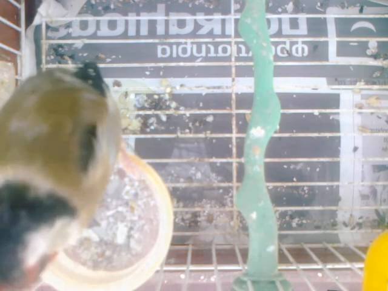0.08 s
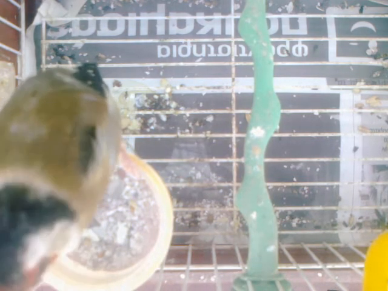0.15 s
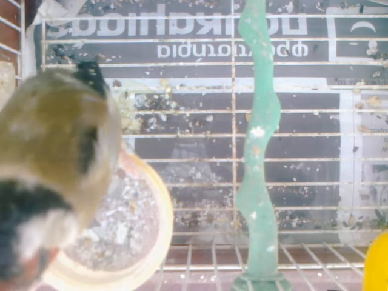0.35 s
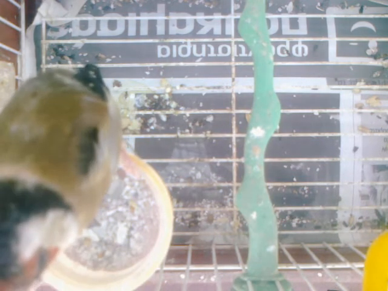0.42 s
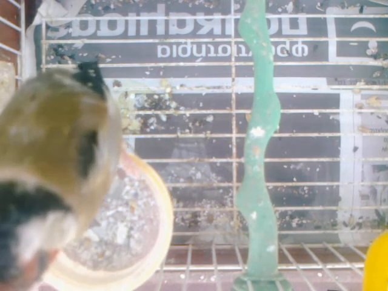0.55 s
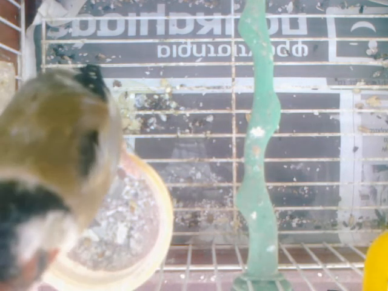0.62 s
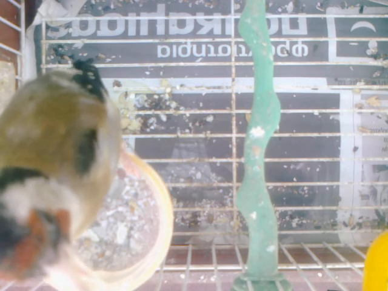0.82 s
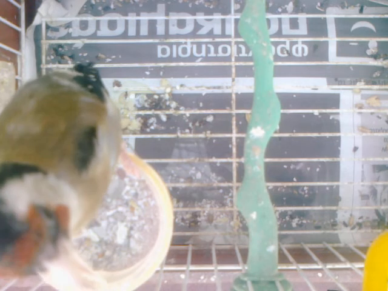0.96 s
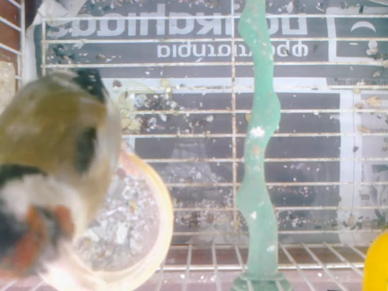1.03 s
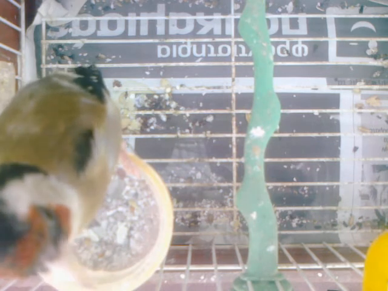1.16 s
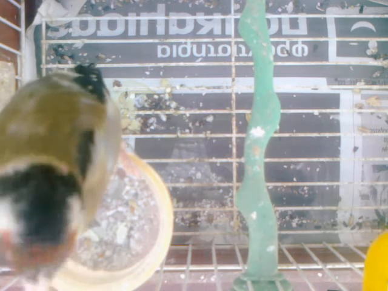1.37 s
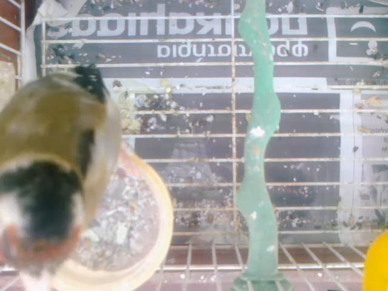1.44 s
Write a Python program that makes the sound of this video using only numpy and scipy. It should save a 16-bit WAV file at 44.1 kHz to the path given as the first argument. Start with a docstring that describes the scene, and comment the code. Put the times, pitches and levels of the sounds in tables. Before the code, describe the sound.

A small caged finch twitters close by, quick rising chirps then four buzzy falling notes

```python
"""First a low indoor rumble with hum and a thin whine, then a goldfinch twittering close by in its cage.
It gives six short slurred chirps, then four longer falling notes that each end in a steep buzzy drop.
The two sides of its syrinx sing separate pitches, which beat and mix into sum and difference tones.
The cage rings thinly and a small room answers faintly; far off, a whistle and a nasal call come late.
Pitch curves drive the voices, filtered noise the rasp and rumble; all reach one microphone channel."""
import sys
import numpy as np
from scipy import signal
from scipy.fft import rfft, irfft
from scipy.io import wavfile
from scipy.ndimage import uniform_filter1d

SR = 44100
rng = np.random.default_rng(int(sys.argv[2]) if len(sys.argv) > 2 else 0)


def master_out(mix):
    """Clip the mix to full scale and print it as 16-bit PCM to the path in sys.argv[1]."""
    frames = np.transpose(np.atleast_2d(mix))
    ceiling = np.clip(frames, -1, 1)
    pcm = np.round(ceiling * 32767).astype(np.int16)
    wavfile.write(sys.argv[1], SR, pcm)


N = 66150
TIME_S = np.arange(N) / SR

# spectrum shape of the room rumble and hiss: (pitch_hz, relative_level_db per Hz)
RUMBLE_SPECTRUM = [(25, 0), (70, 0), (160, -10.5), (1100, -16.5), (2000, -23), (4000, -33.5), (8000, -38),
                   (16000, -46.5)]
# level of the whole background: (time_s, level_db)
BACKGROUND_LEVEL = [(0, -44.5), (.7, -50), (1.3, -52.5), (1.5, -54.5)]
# hum tones: (pitch_hz, level_db re the rumble)
HUM_TONES = [(73, -8), (123, -9)]
# leading side of the syrinx, chirp curves (the second and third join into one slur);
# overtone levels are before the throat: (time_s, pitch_hz, level_db, second_harmonic_db re the tone)
CHIRP_CURVES = [
    [(.196, 1955, -44.5, -11), (.201, 2198, -28.5, -3.5), (.208, 3107, -6.5, -26.5),
     (.213, 3680, -6, -16.5), (.221, 4016, -9, -35), (.230, 4250, -21, -30)],
    [(.276, 2670, -13.5, -6), (.278, 2843, -17.5, -6), (.289, 3088, -12, -5.5), (.297, 3260, -25.5, -1.5)],
    [(.297, 3060, -21.5, -10), (.300, 3490, -12, -17), (.304, 4440, -7, -27), (.311, 5010, -6, -35),
     (.317, 5273, -8.5, -34.5), (.322, 5210, -11, -35), (.328, 5265, -20.5, -29)],
    [(.351, 2310, -42, -20), (.356, 2697, -27, -25.5), (.365, 2630, -15.5, -24), (.376, 2810, -14.5, -26),
     (.381, 2950, -5, -34.5), (.391, 3315, -7, -30), (.398, 3328, -10, -27.5), (.406, 3770, -31.5, -25.5)],
    [(.440, 6180, -19, -16), (.450, 6044, -14, -10), (.458, 6036, -7.5, -20.5), (.469, 6030, -6, -31),
     (.481, 5836, -22, -24)],
    [(.535, 4764, -40, -15.5), (.542, 4823, -19, -8.5), (.548, 4942, -8, -17), (.555, 5107, -4.5, -32),
     (.564, 5133, -7, -31), (.574, 5310, -24.5, -24)],
    [(.620, 2195, -32, -6), (.631, 2570, -28.5, 8), (.638, 2900, -16, -8.5), (.646, 3262, -8, -21.5),
     (.657, 3855, -6, -19), (.663, 3980, -6, -30.5), (.6675, 4068, -20, -28.5)],
]
# the other side joins in for moments: same columns
SECOND_SIDE_CURVES = [
    [(.215, 4244, -35, -30.5), (.223, 4262, -18, -35.5), (.230, 4390, -21, -29)],
    [(.306, 4050, -20.5, -23.5), (.316, 4340, -13.5, -17.5), (.327, 4720, -25, -21)],
    [(.441, 6860, -32.5, -21.5), (.458, 7240, -22, -23), (.478, 7470, -29.5, -20)],
    [(.623, 2836, -34.5, -9.5), (.628, 3070, -18.5, -8.5), (.636, 3280, -14.5, -14),
     (.644, 3563, -11.5, -22), (.648, 3537, -34, -19)],
]
# moments when the chirps turn hoarse: (time_s, noise_level_db before band and throat filters)
HOARSE_MOMENTS = [(0.282, -31), (.634, -21.5)]
# throat and beak colouring of overtones, mixed tones and noise: (pitch_hz, gain_db)
THROAT_COLOUR = [(2100, -13.5), (3100, 2.5), (6200, 3.5), (7200, -15), (9000, -6), (11200, -2),
                 (12100, -3.5), (12800, -19.5), (14200, -13.5), (16000, -20)]
# thin ringing of the cage: (pitch_hz, peak_gain_db)
CAGE_RESONANCES = [(3295, -20.5), (5150, -23), (5560, -23), (6038, -29)]
# near reflections in the room, before its colour: (delay_s, level_db)
ROOM_REFLECTIONS = [(.013, -28), (0.045, -38)]
# colour of the reflections and tail: (pitch_hz, gain_db)
ROOM_TONE = [(1000, 0), (3000, -2.5), (5500, -1), (7500, -3), (10000, 0.5), (16000, -4.5)]
# falling notes; pitch and length entries are factors, levels are offsets: (start_s, drop_start_s,
# upper_pitch, upper_level_db, lower_length, lower_pitch, lower_level_db, drop_length, drop_level_db)
FALLING_NOTES = [(0.7141, 0.7829, 0.98, -1.5, 0.94, 0.99, 0.5, 0.91, 1.5),
                 (.852, 0.9202, 0.98, -0.5, 0.96, 1.0, 0, 0.95, 1),
                 (0.9832, 1.0572, 0.99, 0.5, 1.04, 1.005, -2, .92, 0.5),
                 (1.1229, 1.1963, 0.97, -1, 1.05, 0.99, -3.5, 0.97, 0.5)]
# shared glide shapes of the upper and lower side, before those factors and offsets:
# (from_start_s, pitch_hz, level_db, second_harmonic_db re the tone)
UPPER_GLIDE = [(0, 8960, -21, -30.5), (.004, 8580, -9, -37), (.009, 8020, -7.5, -31),
               (.015, 7770, -12, -14.5), (0.025, 7275, -13.5, -10.5), (0.045, 6458, -7, -28),
               (.053, 6080, -9, -31), (.062, 5647, -6, -20), (.068, 5703, -10, -23),
               (0.072, 5944, -25, -17)]
LOWER_GLIDE = [(.005, 4840, -38.5, 3.5), (.017, 4487, -26, 6.5), (0.032, 4136, -11, -1.5),
               (0.041, 3970, -15.5, -18), (.048, 3850, -25.5, -15), (0.053, 3680, -30.5, -11.5)]
# shared drop shapes, counted from the start of the drop: same columns
UPPER_DROP = [(-.001, 6706, -17.5, -17.5), (.001, 6165, -10.5, -24.5), (.0035, 5287, -7, -27),
              (.0055, 4835, -9, -27), (.009, 5100, -13.5, -14), (.014, 4834, -16.5, -26.5),
              (.020, 3800, -16, -30), (.027, 2750, -21, -5), (.035, 2108, -31, 4)]
LOWER_DROP = [(.008, 4518, -34, -29), (.013, 3568, -15.5, -27), (0.02, 2680, -20.5, 1),
              (0.026, 1987, -26, 6), (.031, 1620, -27, -1), (0.037, 1253, -31, -17)]
# throat colouring during the drops: (pitch_hz, gain_db)
DROP_THROAT_COLOUR = [(1100, -19), (2700, 8), (6100, -1), (7100, -22), (8800, -23.5), (10000, -10),
                      (16000, -30)]
# far whistle: (time_s, pitch_hz, level_db)
WHISTLE_CURVE = [(1.24, 755, -50), (1.305, 915, -45), (1.371, 928, -60.5)]
# far call, one level_db per partial, from the third partial up
CALL_PARTIALS_DB = [-54, -56.5, -62, -67.5, -61]
# mixing in the syrinx, before the throat: sum, difference and sideband tones, overtone rolloff
# per harmonic above the second, and rasp
CHIRP_MIX = dict(sum_db=-15.5, difference_db=-41, sideband_db=-28, rolloff_db=-8, rasp_db=-30)
GLIDE_MIX = dict(sum_db=-1, difference_db=-8, sideband_db=-10, rolloff_db=-20.5, rasp_db=-18.5)
DROP_MIX = dict(sum_db=10.5, difference_db=-8, sideband_db=-8, rolloff_db=-4.5, rasp_db=-6.5)

WHINE_HZ, WHINE_WIDTH_HZ = 10400, 60
WHINE_PEAK_DB = -25.5  # sine amplitude re the rumble, before its random flutter
EDGE_S = .001
JITTER, JITTER_RATE_HZ, SHIMMER_DB = 0.0045, 290, .5  # jitter is a fraction of the pitch
AIR_DB, AIR_WIDTH_HZ = -43.5, 410  # turbulence that rides on the tones
FUZZ_DB, FUZZ_WIDTH_HZ = -7, 500  # overtones and mixed tones flutter much more than the tones
RASP_BAND_HZ, HOARSE_BAND_HZ = (5900, 10000), (3900, 6800)
LONE_RASP_DB = -10  # rasp of the leading side alone, re both together
COUPLING_POWER = 0.79  # mixed tones grow more slowly than the second side's amplitude
CATCHES_S, CATCH_WIDTH_S, CATCH_DEPTH = [.3775, .384], 0.0014, 0.62
HOARSE_WIDTH_S = 0.0075
CAGE_T60_S = .42
ROOM_TAIL_DB, ROOM_T60_S = -21.5, 0.28  # tail level before the room colour
GLIDE_RELEASE_S = 0.0069
CALL_START_S, CALL_ATTACK_S, CALL_HZ = 1.439, 0.031, 505
FAR_BLUR_HZ = 59.98
CUTOFF_HZ = 16000


def from_db(db):
    """Turn decibels into an amplitude gain."""
    return 10 ** (np.asarray(db) / 20)


def rms_one(x):
    """Scale a sound to unit power."""
    return x / np.sqrt(np.mean(x ** 2) + 1e-20)


def coloured(x, points):
    """Filter a sound by a gain curve, interpolated over log frequency."""
    curve_hz, curve_db = np.transpose(points)
    bin_hz = np.maximum(np.arange(N + 1) * SR / (2 * N), 1)
    gain = from_db(np.interp(np.log(bin_hz), np.log(curve_hz), curve_db))
    return irfft(rfft(x, 2 * N) * gain)[:N]  # padding avoids wrap-around


def drift(rate_hz):
    """Smooth random motion of about unit spread: noise through two equal low-pass poles."""
    pole = np.exp(-2 * np.pi * rate_hz / SR)
    smooth = signal.lfilter([1], [1, -2 * pole, pole * pole], rng.standard_normal(2 * N))
    return rms_one(smooth[N:])  # leave out the filter's start


def hiss(band_hz):
    """Band-passed noise with soft edges."""
    band = signal.butter(1, band_hz, "band", fs=SR, output="sos")
    return signal.sosfilt(band, rng.standard_normal(N))


def background():
    """Room rumble and hiss with a phase-wandering hum and a thin fluttering whine, slowly fading."""
    rumble = rms_one(coloured(rng.standard_normal(N), RUMBLE_SPECTRUM))
    hum = np.zeros(N)
    for hz, db in HUM_TONES:
        hum += from_db(db) * np.sqrt(2) * np.sin(2 * np.pi * hz * TIME_S + 1.7 * drift(6.1))
    whine = from_db(WHINE_PEAK_DB) * drift(WHINE_WIDTH_HZ) * np.sin(2 * np.pi * WHINE_HZ * TIME_S)
    level_db = np.interp(TIME_S, *np.transpose(BACKGROUND_LEVEL))
    return (rumble + hum + whine) * from_db(level_db)


def syrinx_side(curves, rolloff_db):
    """One side follows its curves: a slightly unsteady airy tone (complex), and its overtones."""
    hz, gain, bright = np.zeros((3, N))
    for curve in curves:
        time_s, pitch_hz, level_db, second_db = np.transpose(curve)
        inside_s = np.minimum(TIME_S - time_s[0], time_s[-1] - TIME_S)
        gate = np.clip(inside_s / EDGE_S / 2 + .5, 0, 1)
        hz = np.where(gate > 0, np.interp(TIME_S, time_s, pitch_hz), hz)
        gain += np.sin(gate * np.pi / 2) ** 2 * from_db(np.interp(TIME_S, time_s, level_db))
        bright = np.where(gate > 0, from_db(np.interp(TIME_S, time_s, second_db)), bright)
    hz = uniform_filter1d(hz, size=40) * (1 + JITTER * drift(JITTER_RATE_HZ))
    gain = gain * from_db(SHIMMER_DB * drift(JITTER_RATE_HZ))
    phase = 2 * np.pi * np.cumsum(hz) / SR
    overtones = np.zeros(N)
    for k in range(2, 6):
        partial = np.cos(k * phase + np.pi * k * k / 2) * (k * hz < SR / 2)
        overtones += from_db(rolloff_db * (k - 2)) * partial
    air = from_db(AIR_DB) * (drift(AIR_WIDTH_HZ) + 1j * drift(AIR_WIDTH_HZ))
    return gain * np.exp(1j * phase) * (1 + air), gain * bright * overtones


def syrinx(leading, other, throat, sum_db, difference_db, sideband_db, rolloff_db, rasp_db):
    """Two sides on one air stream modulate each other; rasp grows when both sound or overtones swell."""
    a, overtones_a = syrinx_side(leading, rolloff_db)
    b, overtones_b = syrinx_side(other, rolloff_db)
    overtones = overtones_a + overtones_b
    p, q = np.angle(a), np.angle(b)
    mixed = from_db(sum_db) * np.cos(p + q)
    mixed += from_db(difference_db) * np.cos(p - q)
    mixed += from_db(sideband_db) * (np.sin(2 * p - q) - np.sin(p + 2 * q))
    mixed *= np.abs(a) * np.abs(b) ** COUPLING_POWER
    lone = np.abs(from_db(LONE_RASP_DB) * a)
    roughness = np.sqrt(np.abs(a * b) + overtones ** 2 + lone ** 2)
    rasp = from_db(rasp_db) * roughness * hiss(RASP_BAND_HZ)
    fuzz = 1 + from_db(FUZZ_DB) * drift(FUZZ_WIDTH_HZ)
    return (a + b).real + coloured((overtones + mixed) * fuzz + rasp, throat)


def bumps(centre_s, width_s):
    """A brief bell-shaped swell around one moment."""
    return np.exp(-((TIME_S - centre_s) / width_s) ** 2)


def chirps():
    """Short slurred notes; the voice catches twice in one of them and breaks into noise at moments."""
    voice = syrinx(CHIRP_CURVES, SECOND_SIDE_CURVES, THROAT_COLOUR, **CHIRP_MIX)
    catches = sum(bumps(s, CATCH_WIDTH_S) for s in CATCHES_S)
    hoarse = sum(from_db(db) * bumps(s, HOARSE_WIDTH_S) for s, db in HOARSE_MOMENTS)
    hoarse_noise = coloured(hoarse * hiss(HOARSE_BAND_HZ), THROAT_COLOUR)
    return voice * (1 - CATCH_DEPTH * catches) + hoarse_noise


def cage(x):
    """Narrow resonances ring on after a note has swept through them."""
    pole = from_db(-60 / (CAGE_T60_S * SR))
    ringing = np.zeros(N)
    for hz, db in CAGE_RESONANCES:
        poles = [1, -2 * pole * np.cos(2 * np.pi * hz / SR), pole * pole]
        mode = signal.lfilter([1, 0, -1], poles, x + 1e-18)
        ringing += from_db(db) * (1 - pole) * mode
    return ringing


def room(x):
    """Two near reflections and a smooth tail of exponentially decaying noise."""
    response = rng.standard_normal(N) * from_db(-60 * TIME_S / ROOM_T60_S)
    response *= from_db(ROOM_TAIL_DB) / np.sqrt(np.sum(response ** 2))
    for delay_s, db in ROOM_REFLECTIONS:
        response[int(delay_s * SR)] += from_db(db)
    return coloured(signal.fftconvolve(x, response)[:N], ROOM_TONE)


def placed(shape, start_s, length=1, pitch=1, level_db=0):
    """Set a shared note shape at its time, stretched, retuned and made louder or softer."""
    return [(start_s + s * length, hz * pitch, db + level_db, second) for s, hz, db, second in shape]


def glides():
    """Four two-voiced downward slides, each faded out by the time its drop begins."""
    upper, lower, held = [], [], np.zeros(N)
    for start, drop, up_pitch, up_db, low_length, low_pitch, low_db, _, _ in FALLING_NOTES:
        upper.append(placed(UPPER_GLIDE, start, 1, up_pitch, up_db))
        lower.append(placed(LOWER_GLIDE, start, low_length, low_pitch, low_db))
        held += (TIME_S > start - EDGE_S) * np.clip((drop - TIME_S) / GLIDE_RELEASE_S, 0, 1)
    return held * syrinx(upper, lower, THROAT_COLOUR, **GLIDE_MIX)


def drops():
    """The upper side falls and flicks up, then both plunge, overtones sweeping the throat's passband."""
    upper, lower = [], []
    for _, start, *_, length, level_db in FALLING_NOTES:
        upper.append(placed(UPPER_DROP, start, length, 1, level_db))
        lower.append(placed(LOWER_DROP, start, length, 1, level_db))
    return syrinx(upper, lower, DROP_THROAT_COLOUR, **DROP_MIX)


def far_partial(hz):
    """A tone that distance makes waver on its own: both quadratures drift at random."""
    phase = 2 * np.pi * np.cumsum(hz * np.ones(N)) / SR
    wavering = drift(FAR_BLUR_HZ) * np.cos(phase) + drift(FAR_BLUR_HZ) * np.sin(phase)
    return wavering / np.sqrt(2)


def far_calls():
    """A faint rising whistle and, at the end, a faint nasal call of partials above a missing low part."""
    time_s, pitch_hz, level_db = np.transpose(WHISTLE_CURVE)
    whistle_gain = np.interp(TIME_S, time_s, from_db(level_db), left=0, right=0)
    whistle = far_partial(np.interp(TIME_S, time_s, pitch_hz)) * whistle_gain
    call = sum(from_db(db) * far_partial(k * CALL_HZ) for k, db in enumerate(CALL_PARTIALS_DB, 3))
    return whistle + call * np.clip((TIME_S - CALL_START_S) / CALL_ATTACK_S, 0, 1)


def scene():
    """The bird close by, its cage, the room, the far calls and the background, in one channel."""
    bird = chirps() + glides() + drops()
    return (bird + cage(bird) + room(bird) + far_calls() + background())[None]


def record(dry):
    """A steep elliptic low-pass cuts off the top."""
    low_pass = signal.ellip(10, .1, 80, CUTOFF_HZ, fs=SR, output="sos")
    return signal.sosfilt(low_pass, dry)


dry = scene()
out = record(dry)
master_out(out)
```